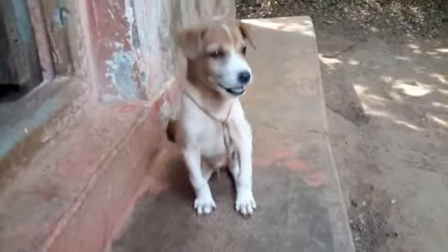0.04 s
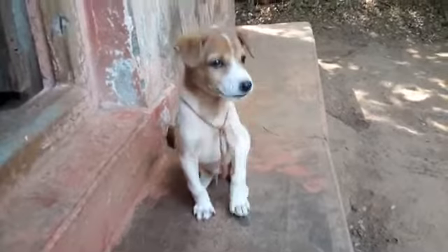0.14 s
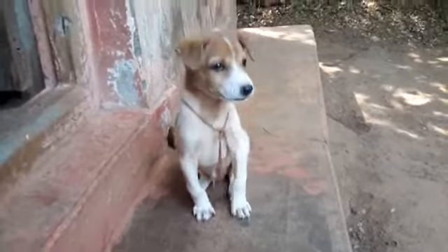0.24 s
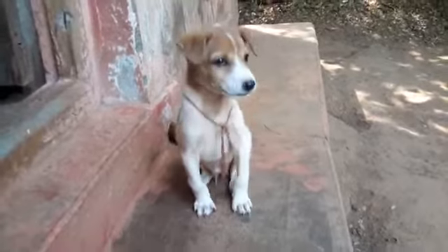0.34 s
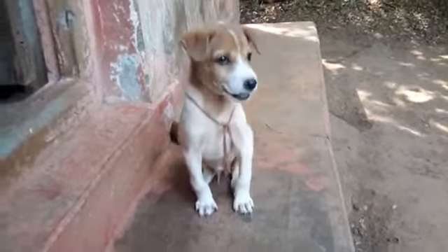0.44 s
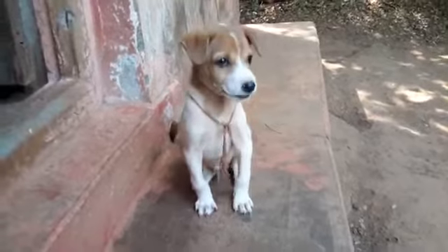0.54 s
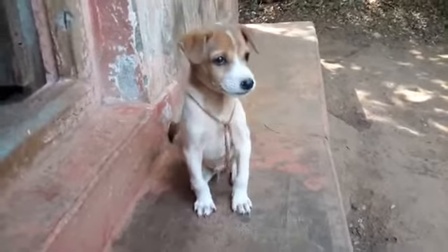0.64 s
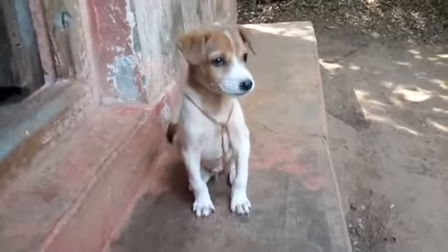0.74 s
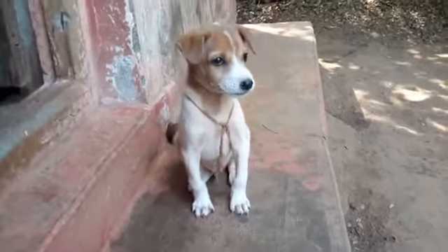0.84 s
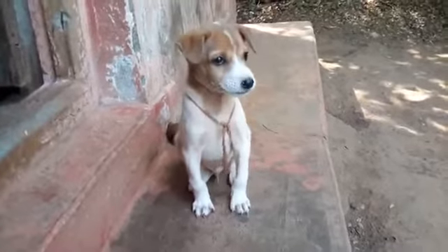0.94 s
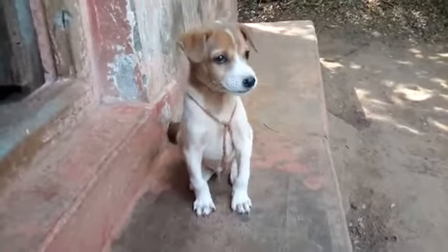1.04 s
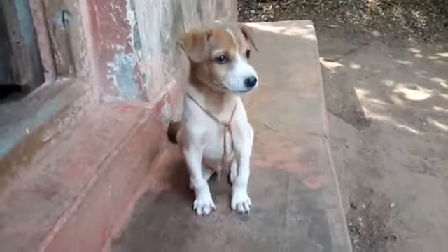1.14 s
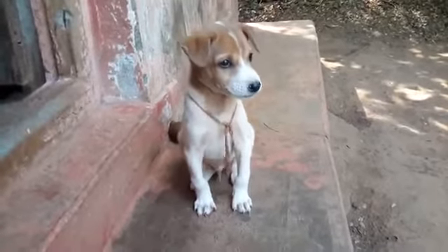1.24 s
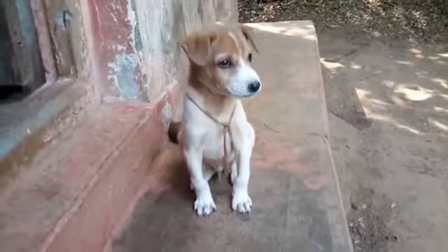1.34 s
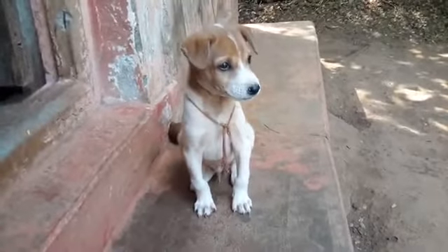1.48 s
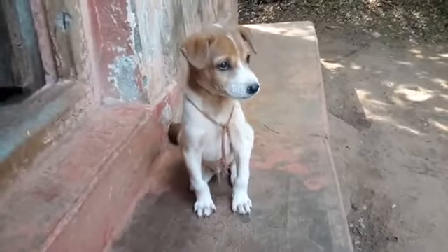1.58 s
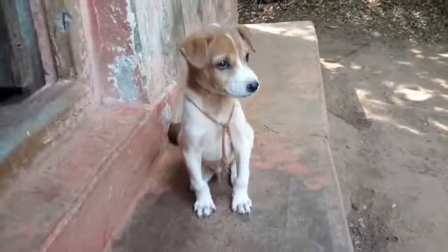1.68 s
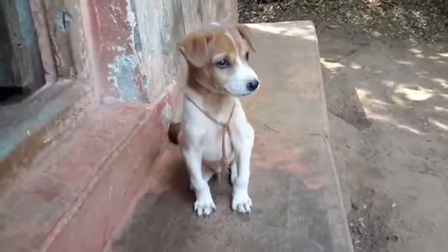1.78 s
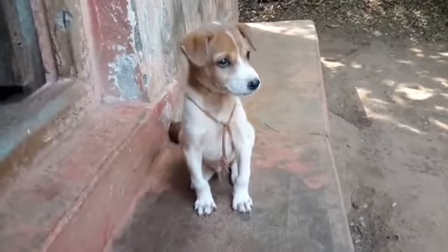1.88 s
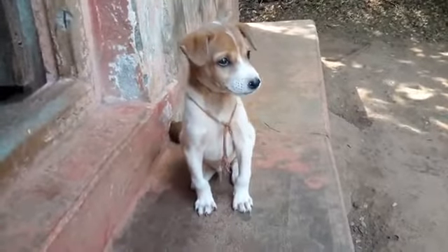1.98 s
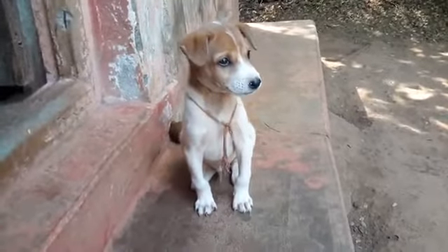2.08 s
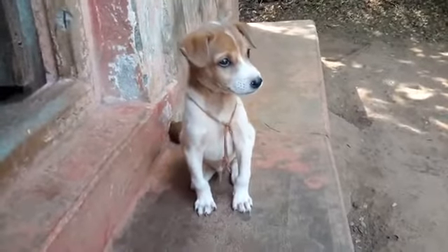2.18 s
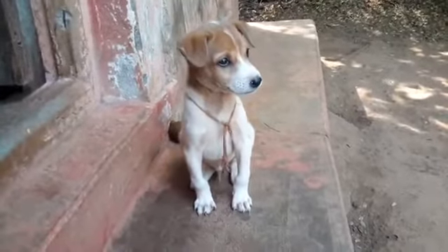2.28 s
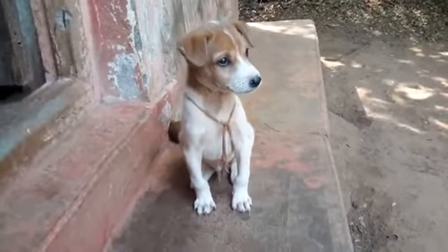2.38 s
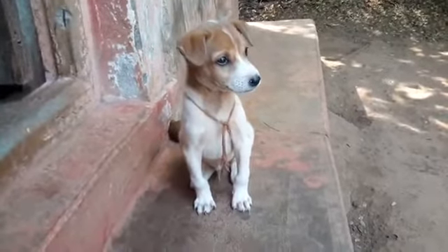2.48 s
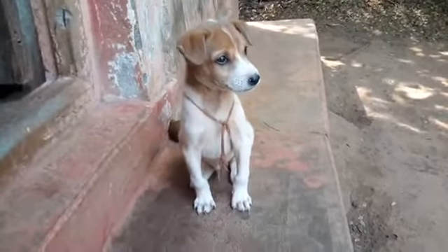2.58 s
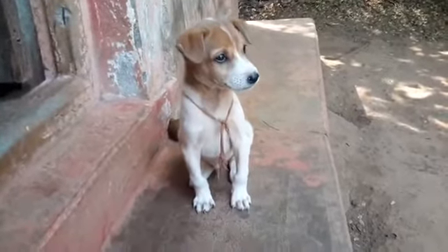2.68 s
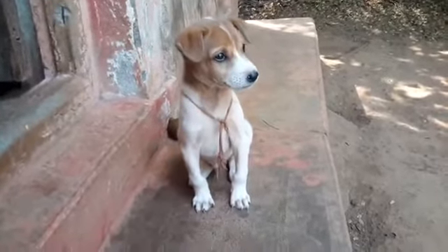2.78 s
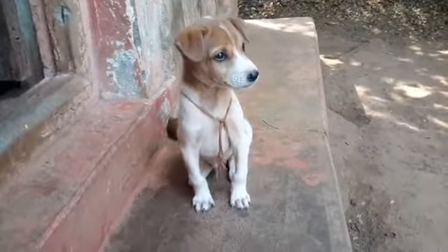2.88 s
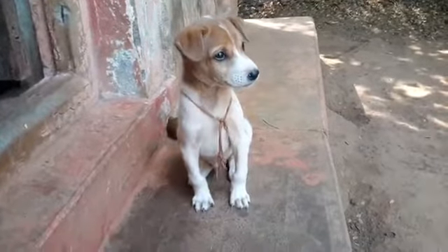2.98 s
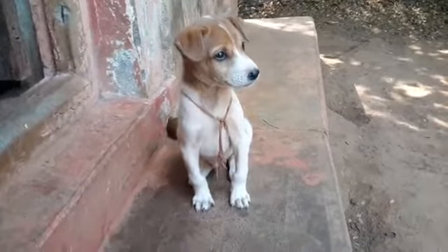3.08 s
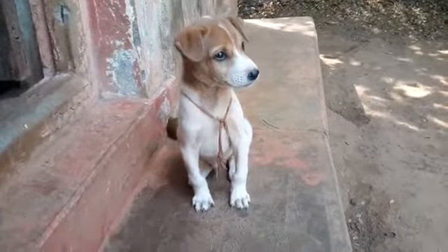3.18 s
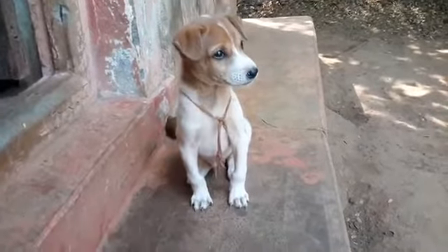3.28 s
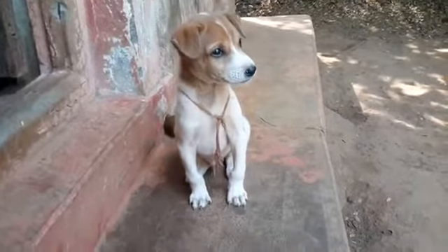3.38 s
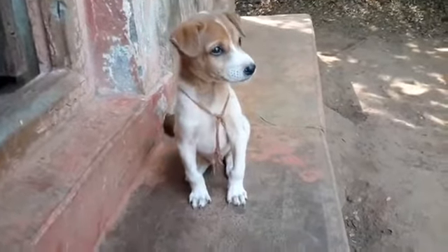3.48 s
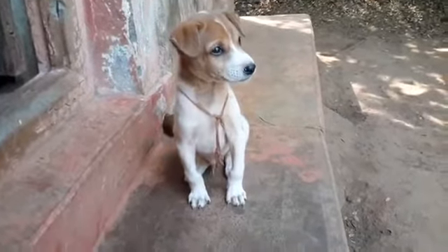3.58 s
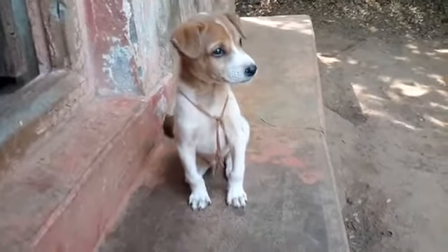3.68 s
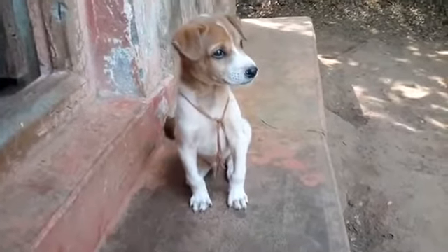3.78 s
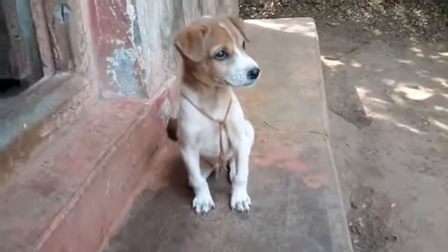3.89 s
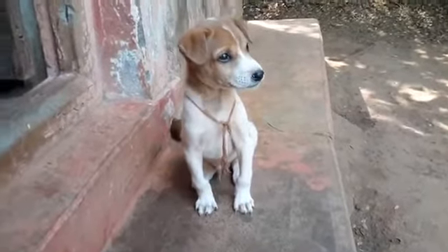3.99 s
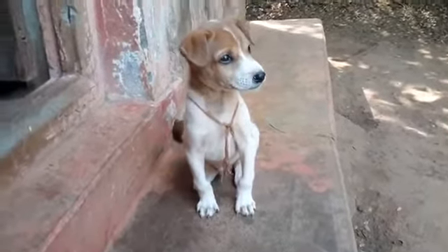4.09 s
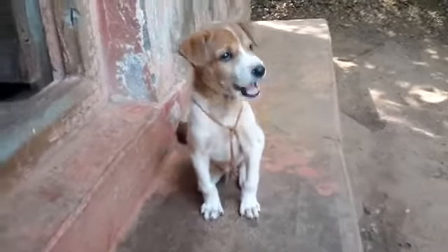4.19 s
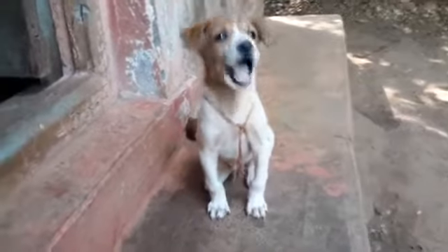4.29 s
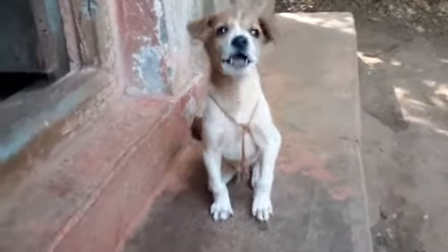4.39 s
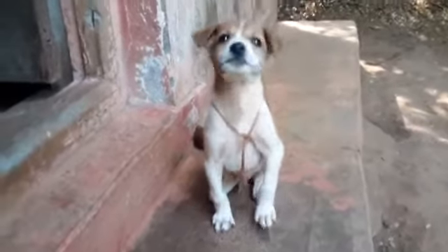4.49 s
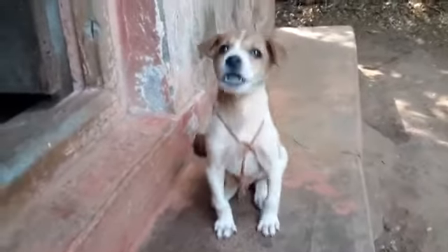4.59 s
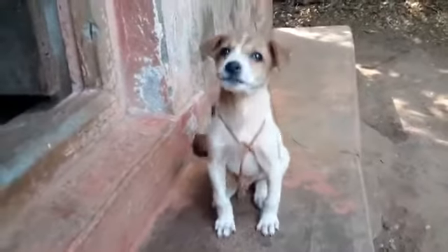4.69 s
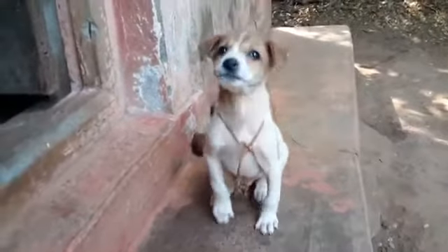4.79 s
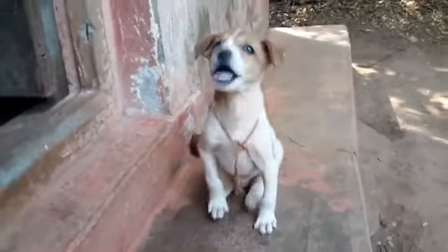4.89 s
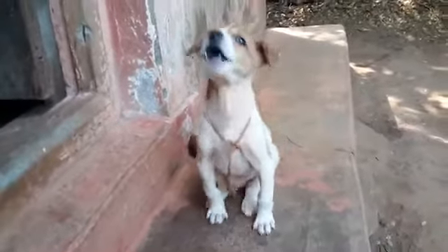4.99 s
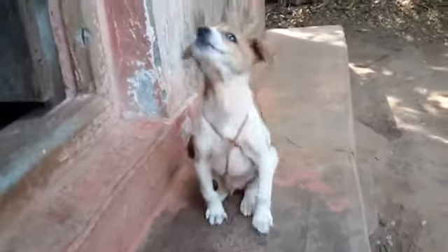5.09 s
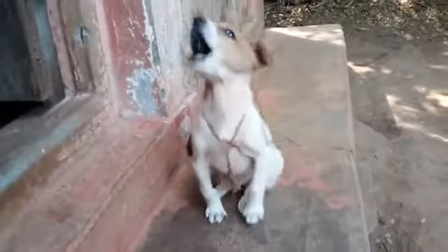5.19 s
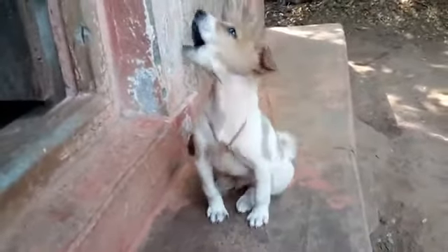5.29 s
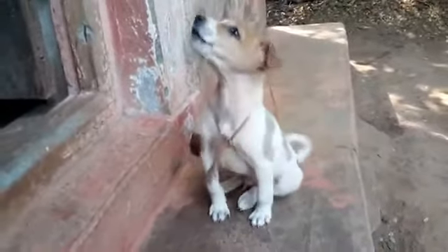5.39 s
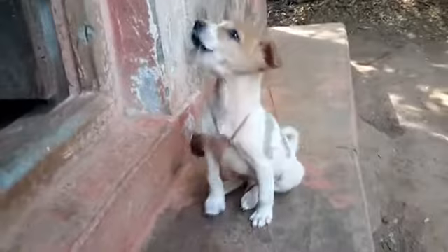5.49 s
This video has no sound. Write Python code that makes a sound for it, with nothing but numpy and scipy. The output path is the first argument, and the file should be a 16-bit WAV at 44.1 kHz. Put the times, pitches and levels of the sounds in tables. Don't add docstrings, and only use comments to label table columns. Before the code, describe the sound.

Quiet yard beside a house, small phone microphone near the puppy. The tail of a bark, two rough breathy barks, light leaf rustle and a weak falling whine open the scene. A muffled knock with scattering grit breaks the lull, with far bird chirps and a brief nose puff. The puppy then whines upward and yips four times, piercing and increasingly loud, each with a quick slap of outdoor reflection.

```python
import sys
import numpy as np
from scipy import signal
from scipy.io import wavfile
from scipy.ndimage import uniform_filter1d, minimum_filter1d

SR = 44100
rng = np.random.default_rng(int(sys.argv[2]) if len(sys.argv) > 2 else 0)


def store_pcm(level_fs):
    pcm = np.round(np.clip(level_fs, -1, 1) * 32767).astype(np.int16)
    wavfile.write(sys.argv[1], SR, np.atleast_2d(pcm).T)


def gain_from_db(level_db):
    decades = np.asarray(level_db, float) / 20
    return 10 ** decades


N = 244314
CHEST_HZ = 620

# time in seconds, pitch in Hz,
# level of the fundamental in dB, mouth opening 0-1, squeeze of the throat 0-1.
RISING_WHINE = [
    [(3.765, 798, -40, 0.5, 0.22), (3.781, 769.2, -34, 0.55, 0.17), (3.797, 863.4, -35.5, 0.49, 0.25),
     (3.815, 955.5, -48.5, 0.66, 0.36), (3.881, 966.4, -41.5, 0.68, 0.4), (3.897, 1003, -46.5, 0.77, 0.48),
     (3.907, 1007, -46, 0.78, 0.49), (3.947, 1014, -49.5, 0.87, 0.61), (3.958, 1060, -41.5, 0.76, 0.45)],
    [(3.97, 1183, -38, 0.74, 0.31), (3.988, 1169, -38.5, 0.83, 0.35), (4.006, 1265, -43, 0.77, 0.69),
     (4.066, 1299, -35, 0.7, 0.63), (4.118, 1407, -32, 0.65, 0.73), (4.148, 1316, -31, 0.47, 0.44),
     (4.156, 1274, -43.5, 0.66, 0.54), (4.19, 1346, -52, 0.54, 0.33)],
]
YIP_ONE = [
    [(4.385, 703.7, -72, 0.64, 0.44), (4.387, 703, -38, 0.8, 0.22), (4.393, 811, -33, 0.31, 0.11),
     (4.401, 826, -33, 0.49, 0.21), (4.407, 848, -39, 0.47, 0.24), (4.415, 1013, -22, 0.73, 0.49),
     (4.425, 1028, -19, 0.79, 0.4), (4.435, 1105, -18, 0.81, 0.47), (4.455, 1152, -26, 0.83, 0.71)],
    [(4.464, 1393, -20.5, 0.72, 0.8), (4.486, 1549, -22.5, 0.49, 0.89), (4.526, 1527, -17.5, 0.34, 0.78),
     (4.534, 1573, -14, 0.47, 0.58), (4.584, 1621, -9, 0.43, 0.58), (4.6, 1634, -10, 0.4, 0.56),
     (4.61, 1405, -19.5, 0.2, 0.56), (4.632, 1418, -33, 0.67, 0.15)],
]
YIP_TWO = [
    [(4.805, 631, -72, 0.84, 0.41), (4.809, 644, -23, 0.66, 0.073), (4.819, 670.6, -36, 0.79, 0.42),
     (4.823, 828.5, -30, 0.73, 0.24), (4.829, 917, -37.5, 0.85, 0.6), (4.835, 967.5, -26.5, 0.83, 0.53),
     (4.855, 1064, -19, 0.88, 0.54), (4.861, 1150, -32, 0.99, 0.82)],
    [(4.8655, 1262, -19, 0.52, 0.69), (4.868, 1314, -14, 0.53, 0.71), (4.88, 1429, -14.5, 0.28, 0.66),
     (4.888, 1467, -17.5, 0.25, 0.34), (4.898, 1477, -15.5, 0.52, 0.7), (4.916, 1466, -18, 0.41, 0.44),
     (4.938, 1340, -17.5, 0.29, 0.51), (4.95, 1280, -24, 0.25, 0.34), (4.962, 1288, -42, .3, 0.44)],
]
YIP_THREE = [
    [(5.103, 782, -39, 1, 0.61), (5.109, 796.6, -31, 0.68, 0.41), (5.121, 982.4, -30, 0.45, 0.68),
     (5.127, 1028, -18, 0.76, 0.43), (5.133, 1028, -14.5, 0.61, 0.7), (5.141, 1126, -11, 0.77, 0.81),
     (5.149, 1157, -23, 0.99, 0.87), (5.159, 1226, -22.5, 0.75, 0.86), (5.164, 1210, -24, 0.91, 0.78)],
    [(5.172, 1378, -14.5, 0.27, 0.78), (5.186, 1605, -10.5, 0.57, 0.44), (5.214, 1621, -11, 0.62, 0.67),
     (5.228, 1637, -8.5, 0.59, 0.3), (5.238, 1591, -6.5, 0.31, 0.54), (5.244, 1500, -9.5, 0.15, 0.28),
     (5.256, 1424, -23.5, 0.44, 0.54), (5.264, 1377, -21, 0.31, 0.34)],
]
YIP_FOUR = [
    [(5.386, 967, -45, .7, 0.65), (5.395, 991.7, -28.5, 0.63, 0.73), (5.401, 1005, -25, 0.64, 0.7),
     (5.409, 1082, -25.5, 0.73, 0.87), (5.421, 1194, -17, 0.76, 0.85), (5.425, 1204, -25, 0.73, 1),
     (5.433, 1293, -3, 0.59, 0.77), (5.437, 1331, -9.5, 0.45, 0.69), (5.44, 1420, -15.5, 0.25, 0.45)],
    [(5.445, 1510, -2, 0.42, 0.61), (5.465, 1557, 2, 0.38, 0.54), (5.5, 1553, 1.5, 0.28, 0.43),
     (5.528, 1592, -4.5, .44, .37), (5.534, 1700, -21, .77, 0.32), (5.55, 1857, -12.5, .85, .5)],
]
HIGH_VOICE = [RISING_WHINE, YIP_ONE, YIP_TWO, YIP_THREE, YIP_FOUR]


def evened(x):
    return x / np.sqrt(np.mean(x ** 2) + 1e-20)


def read(points, hz):
    f, value = np.transpose(points)
    return np.interp(np.log(hz + 1), np.log(f + 1), value)


def add(mix, s, sound):
    part = mix[round(s * SR):][:len(sound)]
    part += sound[:len(part)]


def drift(count, span):
    chance = uniform_filter1d(rng.standard_normal(count), int(span))
    return evened(uniform_filter1d(chance, int(span)))


def resonate(x, hz, width):
    turn = np.exp(2j * np.pi * np.cumsum(hz * np.ones(len(x))) / SR)
    r = np.exp(-np.pi * width / SR)
    return 2 * (turn * signal.lfilter([1 - r], [1, -r], x / turn)).real


def hump(hz, centre_hz, width_hz):
    return 1 / (1 + (2 * (hz - centre_hz) / width_hz) ** 2)


def noise(colour, patchy_db):
    frames, hz = N // 256 + 5, np.fft.rfftfreq(1024, 1 / SR)
    a, b, patches = rng.standard_normal((frames, 513, 3)).T
    patches = evened(uniform_filter1d(uniform_filter1d(patches, 10, 0), 12, 1))
    z = (a + 1j * b) * gain_from_db(read(colour, hz)[:, None] + patchy_db * patches)
    return evened(signal.istft(z, nperseg=1024, noverlap=768)[1][:N])


def burst(curve, colour, patchy_db, lumpy_db):
    s, level_db = np.transpose(curve)
    level_db = np.interp(np.arange(N) / SR, s, level_db, left=-120, right=-120)
    lumps = uniform_filter1d(gain_from_db(level_db + lumpy_db * drift(N, 150)), 90)
    return lumps * noise(colour, patchy_db)


def outdoor_floor():
    # frequency in Hz, level in dB per Hz.
    floor_colour = [(20, -38), (35, -19), (75, -8.5), (235, -11), (590, -18.5), (1010, -21), (1930, -28),
                    (5490, -34), (6300, -40.5), (15200, -50.5)]
    return gain_from_db(-63) * noise(floor_colour, 1.2)


def far_notes():
    # start in seconds, length in seconds, start pitch in Hz, height of the arch in Hz.
    far = [
        (1.92, .04, 3000, 200),
        (2.13, .04, 3000, 200),
        (2.6, .04, 3100, 200),
        (2.785, .055, 2900, 280),
        (2.48, .34, 1130, 30),
        (2.76, .6, 950, 70),
        (3.0, .4, 1170, 40),
    ]
    far_db = [-70.5, -80, -74.5, -71.5, -73, -72.5, -74]
    out = np.zeros(N)
    for (s, length, hz, arch_hz), db in zip(far, far_db):
        air = rng.standard_normal(SR)[:int(length * SR)]
        path = hz + arch_hz * np.sin(np.linspace(0, np.pi, len(air)))
        tone = np.sin(2 * np.pi * np.cumsum(path) / SR)
        blur = evened(resonate(resonate(air, path, 60), path, 60))
        add(out, s, gain_from_db(db) * evened(tone + 0.8 * blur) * np.hanning(len(air)) ** .5)
    return out


def rustle():
    # time in seconds, level in dB.
    level = [
        (.9, -85),
        (.98, -64),
        (1.15, -71.5),
        (1.35, -64),
        (1.8, -73.5),
        (1.95, -73.5),
    ]
    # frequency in Hz, level in dB per Hz.
    colour = [(500, -32), (2000, -5.5), (3500, -1), (6000, -4), (7200, -19.5), (12000, -45)]
    return burst(level, colour, 2.2, 1.)


def scuffs():
    # start in seconds, length in seconds, resonance in Hz, level in dB.
    rubs = [(0.198, 0.22, 210, -46), (.68, 0.16, 161.4, -54), (2.3, 0.27, 159.3, -53),
            (2.329, 0.19, 337, -64), (3.798, 0.053, 213, -54), (4.549, 0.16, 181.4, -56),
            (4.683, 0.094, 192, -52), (5.036, 0.085, 193, -52.5), (2.19, .16, 1144, -54),
            (2.19, 0.062, 1480, -61), (2.235, 0.068, 893, -64), (2.19, 0.1, 641, -65)]
    out = np.zeros(N)
    for s, length, hz, db in rubs:
        grit = rng.standard_normal(SR // 2)[:int(length * SR)]
        rub = evened(resonate(resonate(grit, hz, 52), hz, 52))
        add(out, s, gain_from_db(db) * rub * np.hanning(len(grit)) ** .5)
    return out


def thump():
    # time in seconds, level in dB.
    blow = [
        (2.186, -77.5),
        (2.197, -42.5),
        (2.232, -39.5),
        (2.255, -32),
        (2.3, -35.5),
        (2.42, -46),
        (2.46, -52.5),
        (2.62, -74),
    ]
    grit = [
        (2.19, -82),
        (2.197, -53.5),
        (2.228, -57),
        (2.24, -47.5),
        (2.31, -55.5),
        (2.42, -67.5),
        (2.55, -72),
    ]
    # frequency in Hz, level in dB per Hz.
    blow_colour = [(35, -68), (110, -28.5), (198, 3.5), (250, -16), (357, -11.5), (480, -17.5), (1400, -30),
                   (4410, -43.5), (9000, -63.5), (11700, -90.5), (19800, -120)]
    grit_colour = [(300, -30.5), (900, -3.5), (1500, -0.5), (3000, -7), (5500, -13.5), (7000, -27),
                   (10000, -54.5), (19800, -90)]
    return burst(blow, blow_colour, 1.1, 0.5) + burst(grit, grit_colour, 0.97, 0.73)


def sniff():
    # time in seconds, level in dB.
    level = [
        (3.52, -76),
        (3.545, -57),
        (3.575, -55),
        (3.62, -65),
        (3.72, -72),
    ]
    # frequency in Hz, level in dB per Hz.
    colour = [(35, -28.5), (60, 0), (520, -30.5), (727, -14.5), (2450, -18), (9000, -35.5), (11700, -66.5),
              (19800, -120)]
    return burst(level, colour, 0.63, 1.2)


def bark_hiss():
    # time in seconds, level in dB.
    level = [
        (0, -35.5),
        (.17, -52.5),
        (.2, -52),
        (.25, -31.5),
        (.33, -34),
        (.43, -44),
        (.6, -70.5),
    ]
    # frequency in Hz, level in dB per Hz.
    colour = [(59, -38), (110, -21.5), (220, -12), (1000, -12), (3000, -12), (5370, -7), (7500, -16),
              (15000, -32)]
    return burst(level, colour, 1.5, 1.1)


def yard(puppy):
    # time in seconds, level in dB.
    facing = [(0, -1.7), (.55, 2), (1.2, 0.5), (1.8, -1.5), (3.7, 8), (4.3, -2.5), (4.381, 1.8), (4.75, 2),
              (5.05, 0.5), (5.35, 1), (5.54, 3.5)]
    # frequency in Hz, time to fall 60 dB in seconds.
    yard_t60 = [(200, .3), (800, .34), (1600, .4), (4500, .33), (8000, .36), (14000, .3)]
    wall_delay_s, wall_t60_s, wall_db = .003, .13, -14
    yard_db, hill_db, hill_t60_s = -21, -28, .8
    sent = puppy * gain_from_db(np.interp(np.arange(N) / SR, *np.transpose(facing)))
    out, at = np.zeros(N), np.arange(0, SR // 2 - 20, 20)
    for k in range(3):
        taps = np.zeros(SR // 2)
        taps[at + rng.integers(0, 20, len(at))] = rng.choice([-1., 1.], len(at))
        late = np.arange(SR // 2) / SR - wall_delay_s
        hz, t, z = signal.stft(taps, SR, nperseg=256)
        decay = gain_from_db(-60 * t / read(yard_t60, hz)[:, None]) + gain_from_db(hill_db - 60 * t / hill_t60_s)
        tail = signal.istft(z * decay, SR, nperseg=256)[1][:len(taps)]
        near = taps * gain_from_db(-60 * late / wall_t60_s)
        both = gain_from_db(yard_db) * tail / np.linalg.norm(tail) + gain_from_db(wall_db) * near / np.linalg.norm(near)
        both = both * (late > 0)
        share = np.sqrt(2 / 3) * np.cos(2 * np.pi * (23 * np.arange(N) / SR + k / 3))
        out += share * signal.fftconvolve(sent, both)[:N]
    return out


def squeak(s, length, start_hz, end_hz, db):
    fold_hz = np.interp(s + length / 2, *np.concatenate(sum(HIGH_VOICE, [])).T[:2])
    hz = np.linspace(start_hz, end_hz, int(length * SR))
    hz = hz * (1 + .004 * drift(len(hz), 120))
    lines = sum(gain_from_db(-10. * k) * np.cos(2 * np.pi * np.cumsum(hz - k * fold_hz) / SR) for k in range(4))
    return s, gain_from_db(db) * lines * np.hanning(len(hz)) ** .5


def squeaks():
    # start in seconds, length in seconds, start pitch in Hz, end pitch in Hz, level in dB.
    whistles = [
        (3.956, 0.032, 14650, 14650, -57),
        (3.951, .05, 13550, 13450, -52),
        (4.146, .03, 14800, 14700, -57.5),
        (4.149, 0.029, 13700, 12900, -41),
        (4.431, 0.05, 15000, 14850, -36.5),
        (4.502, 0.019, 14500, 14000, -68),
        (4.93, 0.0205, 13400, 12300, -72),
        (5.16, 0.033, 14200, 13000, -76),
    ]
    out = np.zeros(N)
    for row in whistles:
        add(out, *squeak(*row))
    return out


def controls(rows):
    s, *columns = np.transpose(rows)
    t = np.arange(s[0], s[-1], 1 / SR)
    k = np.arange(1, 15000 // min(columns[0]) + 1)[:, None]
    return t, k, [uniform_filter1d(np.interp(t, s, c), 150) for c in columns]


def roughness(t, hz, start, end):
    clean, chest_rough, settle_s, fray_s = .04, .07, .013, .012
    held = clean + chest_rough * (hz < CHEST_HZ)
    return held + start * np.exp((t[0] - t) / settle_s) + end * np.exp((t - t[-1]) / fray_s)


def top_air(under_db, *partials_db):
    lag_s = .012
    return under_db + uniform_filter1d(np.max(partials_db, axis=0), int(lag_s * SR) + 1)


def cry(t, k, hz, heights, rough, air_db, hollows, tilt, edge_hz):
    # frequency in Hz, level in dB.
    sheen_colour = [(6800, -26.5), (8100, -35), (9000, -17.5), (10300, -10.5), (11500, -10.5), (13500, -8),
                    (15000, -13)]
    # frequency in Hz, level in dB.
    cavities = [(9100, -2.5), (10100, 0.5), (11600, -10.5), (13600, 0), (14600, -5.5)]
    rough = np.clip(rough, 0, 1)
    wander = .05 * rough * drift(len(t), 60) + .0015 * drift(len(t), 350)
    turns = np.cumsum(hz * (1 + wander)) / SR
    sheen = gain_from_db(air_db + read(sheen_colour, k * hz) + tilt * (k * hz / 1000 - 9.5))
    sheen = sheen * hz / 1500 * gain_from_db(-8 * (hz < CHEST_HZ))
    waver_db = 1.1 * (k > 1) + 4 * rough + 4 * (k * hz > 7500)
    waver_db = waver_db * np.array([drift(len(t), 300) for _ in k])
    edge = 1 / (1 + (k * hz / edge_hz) ** 30)
    heights = (heights * edge + sheen) * gain_from_db(waver_db) * (k * hz < 15000)
    voice = (heights * np.cos(2 * np.pi * k * turns + 0.39 * k ** 2)).sum(0)

    puffs = (0.64 + np.exp(-(turns % 1) / .3)) * rng.standard_normal(len(t))
    breath = sum(gain_from_db(db) * evened(resonate(resonate(puffs, f, 2300), f, 1800)) for db, f in hollows)
    breath = signal.lfilter(*signal.butter(5, [500, 6600], "band", fs=SR), breath)
    hiss = 0
    for f, db in cavities:
        level_db = db + tilt * (f / 1000 - 12) + 3 * drift(len(t), 900)
        hiss = hiss + gain_from_db(level_db) * resonate(resonate(puffs, f, 750), f, 750)
    top = gain_from_db(air_db - 9 + 3 * (hz < CHEST_HZ) - 4 * (hz > 1100)) * evened(hiss)
    fade = np.clip(np.minimum(t - t[0], t[-1] - t) / 0.0021, 0, 1)
    return t[0], fade * ((1 - .5 * rough) * voice + .65 * rough * breath + top)


def bark(rows, breaks, air_db, tilt, hoarse, shape, valley):
    # pitch in Hz, level in dB.
    chest_first = [(260, -41), (370, -39), (480, -24.5), (600, -28)]
    t, k, (hz, mouth_db, opening, squeeze) = controls(rows)
    chest, chest_call = hz < CHEST_HZ, hz.mean() < CHEST_HZ
    gape_lift_db, jaw_db, ring_steep = shape
    valley_db, edge_hz = valley
    first_db = mouth_db + 14 - 42 * opening
    ring_db = mouth_db - 25 + 45 * squeeze
    if chest_call:
        first_db = np.minimum(read(chest_first, hz), mouth_db + 19)
    mouth_hz = np.maximum(2.22 * hz, 400 + 1700 * opening)
    ring_hz = 4230 + (566 + 450 * chest) * opening
    mouth = gain_from_db(mouth_db) * hump(k * hz, mouth_hz, 560) ** (.9 + .3 * chest)
    ring_width_hz = 540 * np.clip(950 / hz, 1, 2)
    ring = gain_from_db(ring_db) * hump(k * hz, ring_hz, ring_width_hz) ** ring_steep
    gape = gain_from_db(mouth_db - 18 + gape_lift_db - 45.5 * (1 - opening)) * chest
    gape = gape * (hump(k * hz, 6250, 900) + gain_from_db(jaw_db) * hump(k * hz, 1420, 190))
    nose = gain_from_db(valley_db * hump(k * hz, 3500, 700))
    heights = np.where(k == 1, gain_from_db(first_db), (mouth + ring + gape) * nose)

    shut_db = 8 * np.clip(1 - (t - t[0]) / .05, 0, 1) * chest_call
    follows = 0.389
    air = top_air(air_db, *(follows * np.array([first_db, mouth_db, ring_db]) - shut_db))
    rough = hoarse + roughness(t, hz, *breaks)
    return cry(t, k, hz, heights, rough, air, [(mouth_db, mouth_hz), (ring_db, ring_hz)], tilt, edge_hz)


def low_voice():
    # time in seconds, pitch in Hz, mouth level in dB, mouth opening 0-1, squeeze of the throat 0-1.
    bark_tail = [
        [(0, 912, -29, 0.18, 0.75), (.022, 847, -34, 0.16, .55), (.05, 737, -42, .05, 0.38)],
    ]
    bark_one = [
        [(.2, 348, -41.5, 0.26, 0.57), (.212, 408, -19.5, 1.23, 0.28), (.22, 429.3, -7, 1.04, 0.28),
         (.232, 453, -10.5, 1.15, 0.19), (.242, 446.3, -14.5, 0.92, 0.49), (.255, 489.6, -15, 0.68, 0.57),
         (.268, 527, -12.5, 0.93, 0.25), (.282, 572, -15, 0.68, 0.59), (.293, 600, -22.5, 0.97, 0.71)],
        [(.277, 1009, -25, 0.99, 0.95), (.29, 973, -26, 0.81, 0.8), (.305, 940.3, -20, 0.7, 0.81),
         (.35, 931, -22, 0.84, 0.93), (.375, 940.6, -29.5, 0.63, 0.94), (.398, 895, -32.5, 0.52, 0.94),
         (.408, 877, -20.5, 0.4, 0.083), (.43, 736, -39.5, 0.18, .3)],
    ]
    bark_two = [
        [(.62, 244.5, -42.5, 0.061, -0.22), (.638, 291.4, -27.5, 0.045, -.15), (.655, 326, -34, 0.5, 0.2),
         (.674, 359.2, -16.5, 0.59, 0.29), (.692, 414.3, -13.5, 0.82, 0.27), (.715, 460, -18, 0.76, 0.55),
         (.74, 476.6, -17.5, 0.64, 0.6), (.76, 506, -13, 0.89, 0.39), (.783, 613, -15.5, 0.71, 0.79)],
        [(.772, 944, -23, 0.66, 1), (.785, 925, -24, 0.84, 0.95), (.81, 911.7, -23.5, 0.77, 1),
         (.848, 899.5, -23.5, 0.45, 0.82), (.862, 895, -29.5, 0.26, 0.65), (.89, 871, -34, 0.2, 0.57),
         (.905, 810, -30, 0.25, 0.11), (.915, 672, -29, 0.33, 0.35), (.935, 653, -47, 0.13, 0.49)],
    ]
    whine = [
        [(1.349, 300, -38, 0.12, 0.044), (1.358, 311.8, -50.5, 0.14, 0.16), (1.37, 336, -48, 0.61, 0.29),
         (1.39, 380.7, -44, 0.57, 0.34), (1.402, 449.5, -37, 0.34, 0.47), (1.414, 530, -37.5, 0.93, 0.39)],
        [(1.409, 495.8, -55, 0.12, 0.74), (1.415, 563.5, -40, 0.17, .5), (1.421, 650, -31, 0.14, 0.42),
         (1.43, 677, -32, 0.29, 0.41), (1.478, 685.4, -32, 0.29, 0.42)],
        [(1.474, 797.4, -33, 0.14, 0.51), (1.525, 822.7, -31, 0.099, 0.49), (1.595, 795, -34.5, 0.11, 0.49),
         (1.608, 727, -34.5, .15, 0.47)],
        [(1.604, 716.4, -39.5, 0.12, 0.36), (1.615, 664.8, -32, 0.23, 0.47), (1.66, 656.4, -33.5, 0.11, 0.4),
         (1.708, 604, -42.5, 0.0089, 0.5), (1.722, 738.6, -42, 0.1194, 0.35), (1.736, 705, -48.5, 0.1, 0.3),
         (1.746, 671, -75, .1, .3)],
    ]
    breaks = [(.1, .4), (.2, .6), (.2, .5), (.1, .7), (.2, .5), (.1, .25), (.08, .4), (.35, .45), (.4, .7)]
    air_db = [-48, -43.5, -42.5, -47.5, -41.5, -57, -51, -45, -46.5]
    tilt = [-1.5, -0.5, -1, 0.5, -2.5, 2, 1.5, 1.3, 2]
    hoarse = [.02, .04, .02, .0, .0, .0, .0, .03, .03]
    # gape in dB, jaw over gape in dB, steepness of the ring.
    shape = [(-.1, 10.5, 0.99), (-6, 15, 0.99), (-.1, 10.5, 0.98), (-8.5, 11, 1), (-4.2, 9.5, 0.78),
             (-4, 13.5, 0.52), (-7, 10.5, 0.52), (-.1, 10.5, 0.46), (1, 10.5, 0.61)]
    # depth of the nose's valley in dB, upper edge of the partials in Hz.
    valley = [(-3.5, 7550), (-4.5, 7400), (-1, 7300), (-5.5, 6800), (-4.5, 7600), (0, 7000), (-6, 6900),
              (-5.5, 7300), (-4.5, 7200)]
    out = np.zeros(N)
    for row in zip(bark_tail + bark_one + bark_two + whine, breaks, air_db, tilt, hoarse, shape, valley):
        add(out, *bark(*row))
    return out


def yip(call, breaks, low, high, air):
    t, k, (hz, first_db, opening, squeeze) = controls(call[0] + call[1])
    change = call[0][-1][0]
    upper = np.clip((t - change) / .006 + .5, 0, 1)
    air_db, throat_db, fading_db = (a + (b - a) * upper for a, b in zip(low, high))
    loud_db = first_db[t < change].max() * (1 - upper) + first_db[t >= change].max() * upper
    second_db = first_db - 45 + 60 * opening
    third_db = first_db - 35 + 55 * squeeze
    since = np.where(t < change, (t - t[0]) * (1 - upper), t - change)
    throat_db = third_db + throat_db + fading_db * since
    throat_hz = 5517 + 34 * loud_db
    heights = gain_from_db(throat_db) * (hump(k * hz, throat_hz, 1600) ** 1.8 + gain_from_db(-31))
    heights[:3] = gain_from_db([first_db, second_db, third_db])
    rough = roughness(t, hz, breaks[0], breaks[2]) + breaks[1] * np.exp(-abs(t - change) / .013)
    return cry(t, k, hz, heights, rough, top_air(air_db, first_db, second_db, third_db),
               [(second_db, 2 * hz), (third_db, 3 * hz), (throat_db, 5300)], *air)


def high_voice():
    breaks = [(.9, .1, .9), (.6, .12, 1.6), (.6, .12, .9), (.5, .12, .8), (.5, .05, 1.5)]
    # top air under the loudest partial in dB,
    # throat over third partial in dB, its fading in dB per second.
    colour = [(-46, 9, -5), (-27.5, 15.5, -101), (-41, 12, 55), (-25, -1.5, 34), (-40, 13, 39.5),
              (-22.5, 7, -61), (-42.5, 2.5, -35.5), (-34, 9.5, -600), (-46, 7, -300), (-50, -6.5, -600)]
    # lean of the top air in dB per kHz, upper edge of the partials in Hz.
    air = [(0.6, 7550), (-1, 7100), (-2.5, 7800), (-0.4, 7900), (0.25, 5600)]
    out = np.zeros(N)
    for row in zip(HIGH_VOICE, breaks, colour[::2], colour[1::2], air):
        add(out, *yip(*row))
    return out


def scene():
    puppy = low_voice() + high_voice() + squeaks()
    step = scuffs() + thump() + sniff() + bark_hiss()
    surroundings = outdoor_floor() + far_notes() + rustle()
    return (puppy + yard(puppy) + step + surroundings)[None]


def low_pass(x):
    return signal.sosfilt(signal.butter(12, 15140, fs=SR, output="sos"), x)


def record(dry):
    x = signal.lfilter(*signal.butter(2, 45, "high", fs=SR), dry)
    peak_db = 20 * np.log10(-minimum_filter1d(-abs(x), size=441) + 1e-9)
    over_db = uniform_filter1d(np.maximum(peak_db + 4, 0), size=551)
    held = x / gain_from_db(.75 * over_db)
    return low_pass(held)


dry = scene()
out = record(dry)
store_pcm(out)
```